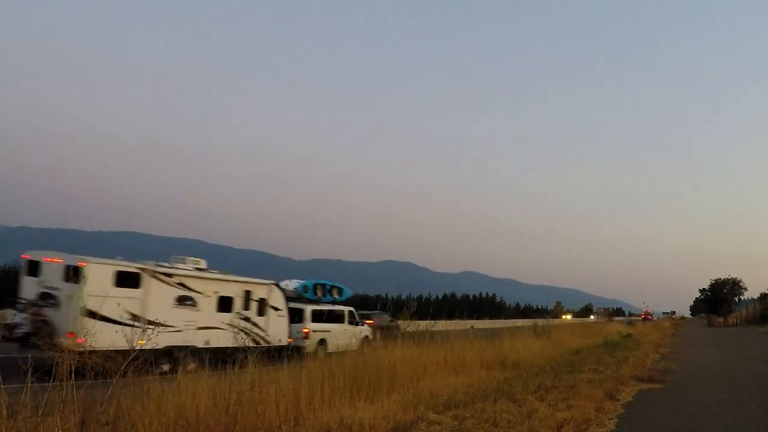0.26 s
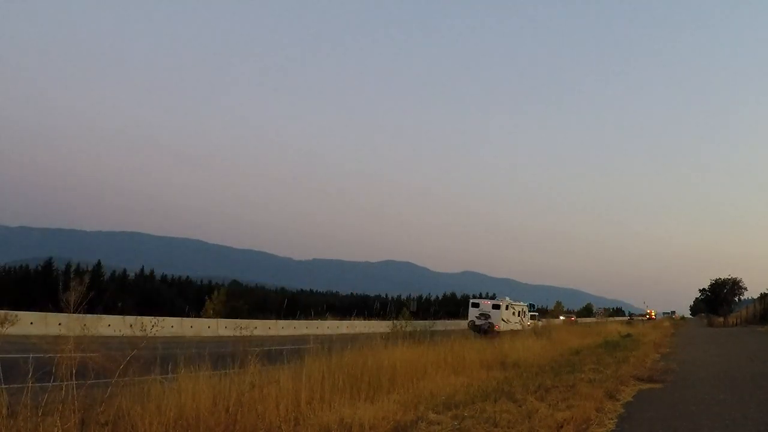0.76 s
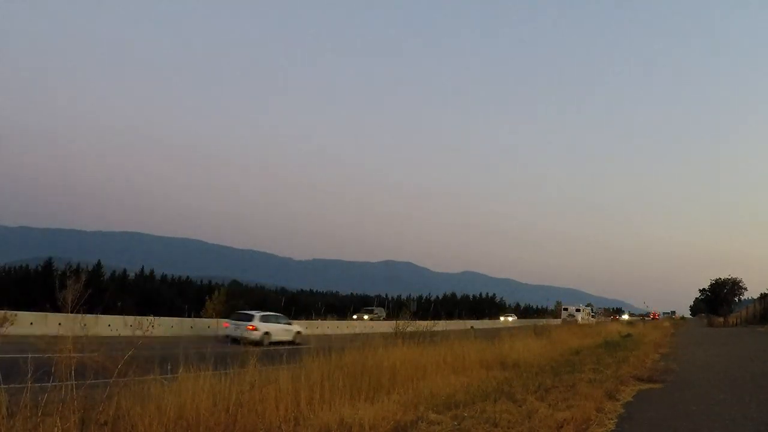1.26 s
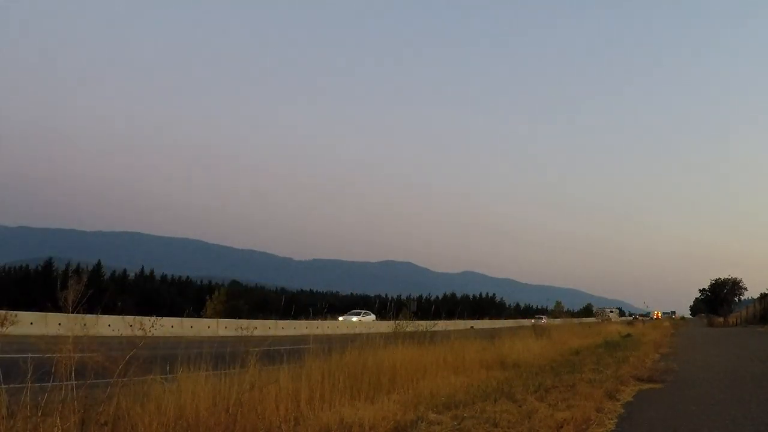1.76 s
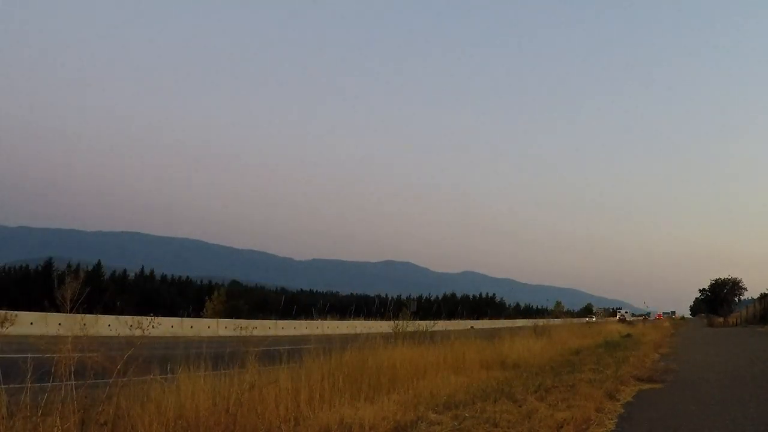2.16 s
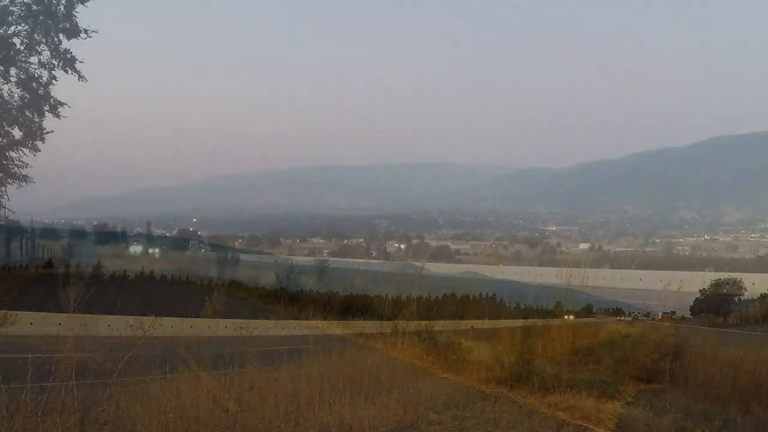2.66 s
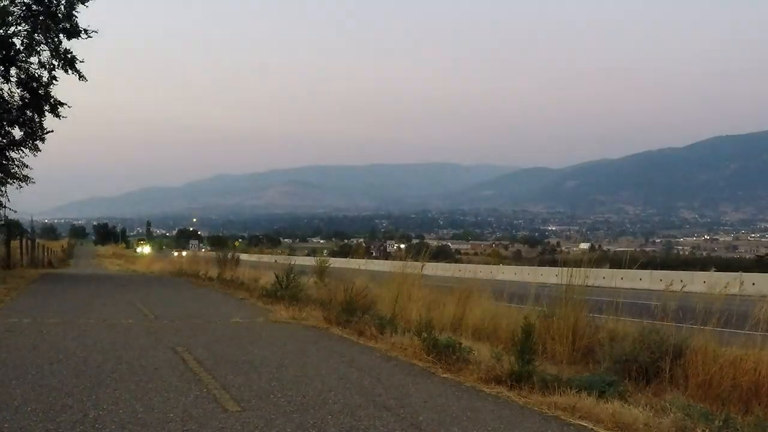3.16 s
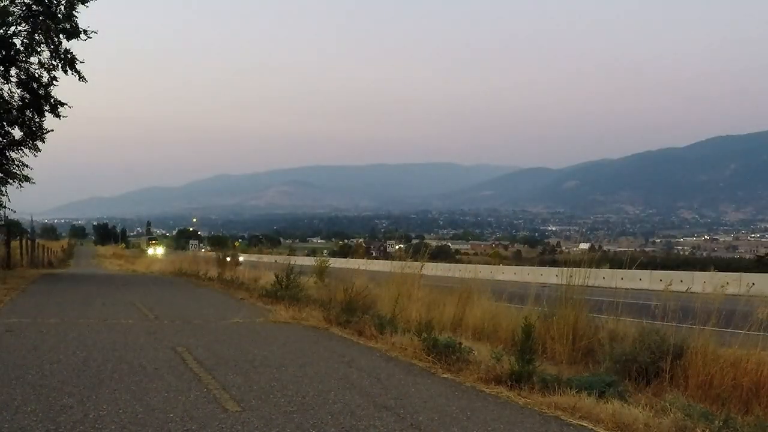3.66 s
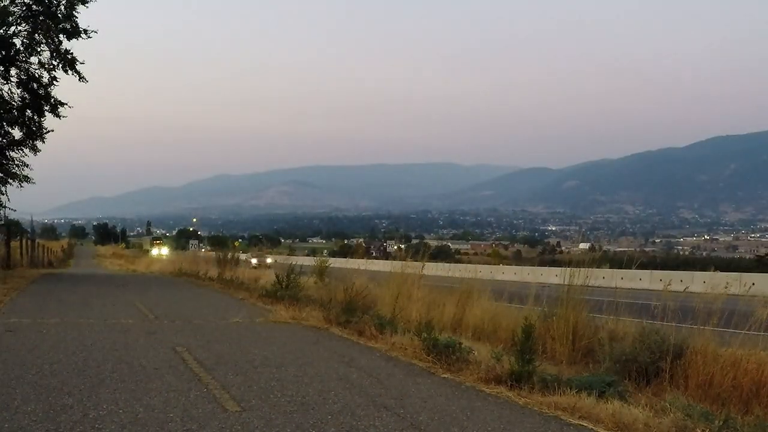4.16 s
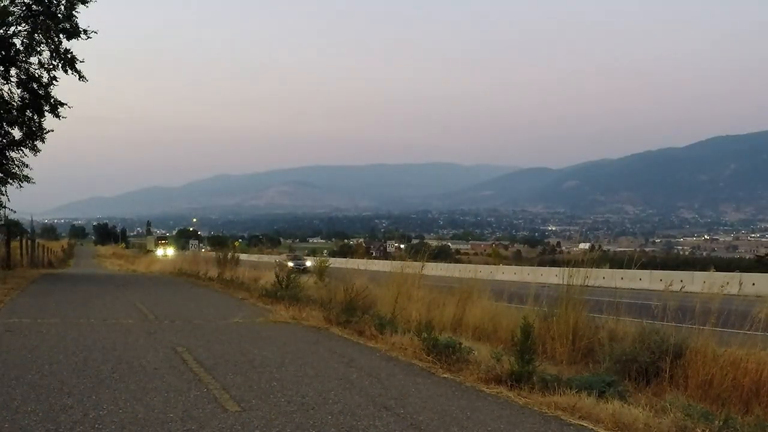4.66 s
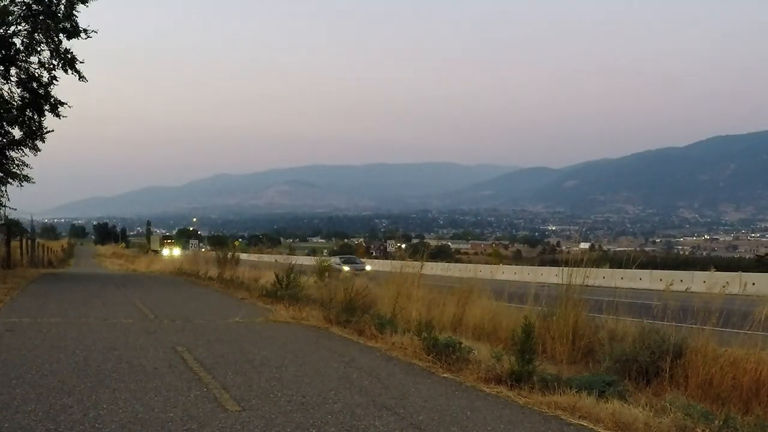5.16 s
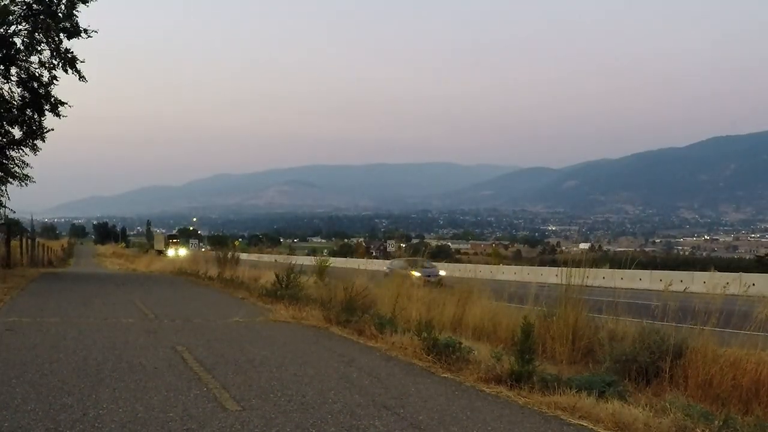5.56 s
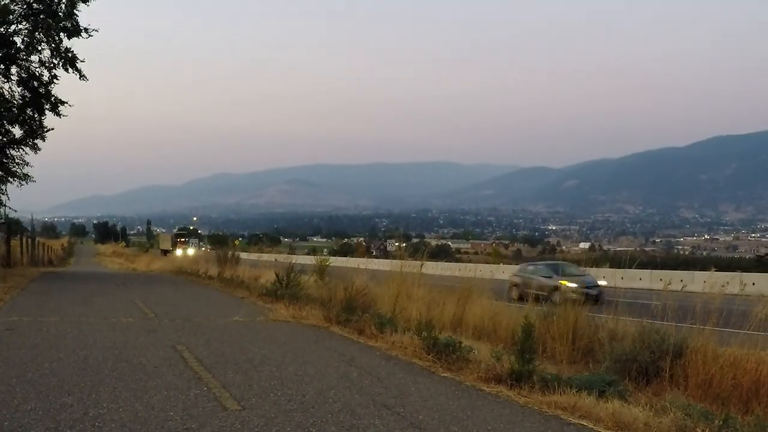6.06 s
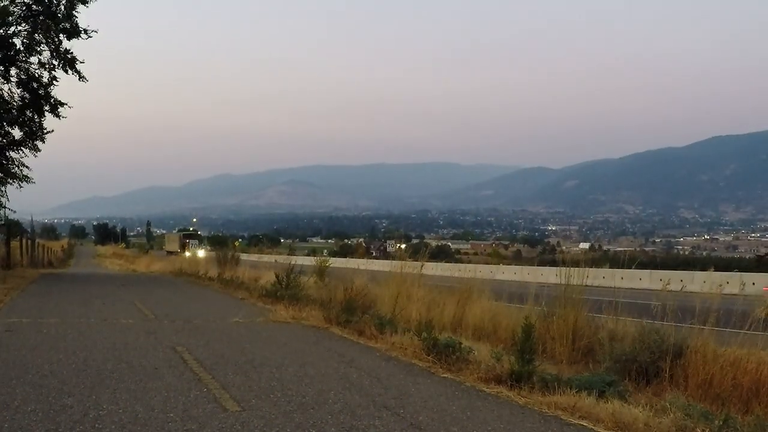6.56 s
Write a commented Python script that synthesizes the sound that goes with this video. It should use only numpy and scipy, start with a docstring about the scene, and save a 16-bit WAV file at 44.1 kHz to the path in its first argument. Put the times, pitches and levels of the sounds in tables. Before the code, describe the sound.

Close roadside microphone in open air. Dull, dense tyre roar and diesel hum build in overlapping surges, with bassy air buffeting and two small hard taps close by. A throaty exhaust boom and airy hiss mark the last wheels passing. The sound melts into quieter distant road rumble before a car swells steadily into a loud, bright tyre rush.

```python
"""Beside a highway: a heavy diesel truck goes by close to the microphone, then cars come on, louder and brighter.
Tyres are noise shaped over time by passing distance, with narrow sliding bands, exhaust booms, hollows and lifts;
engines, exhaust drones and a whine are wavering notes with an octave above, the diesel and drones sinking in pitch.
The truck's wake is lumpy low noise at the microphone; right next to it come a hard tick and a weaker one.
Faint clicks and an even hiss lie beneath."""
import sys
import numpy as np
from scipy import signal
from scipy.fft import rfft, irfft, next_fast_len
from scipy.io import wavfile
from scipy.ndimage import uniform_filter1d

SR = 44100
rng = np.random.default_rng(int(sys.argv[2]) if len(sys.argv) > 2 else 0)


def master_out(mix):
    """Clip the mix to full scale and print it as 16-bit PCM to the path in sys.argv[1]."""
    frames = np.transpose(np.atleast_2d(mix))
    ceiling = np.clip(frames, -1, 1)
    pcm = np.round(ceiling * 32767).astype(np.int16)
    wavfile.write(sys.argv[1], SR, pcm)


N = 301203

TIME = np.arange(N) / SR
FRAME, HOP = 2048, 512   # samples in a spectral frame and between frames
FRAME_S = np.arange(N // HOP + 2) * HOP / SR
BIN_HZ = np.maximum(np.arange(FRAME // 2 + 1) * SR / FRAME, 1)

# The truck's groups of wheels going by. Each row: nearest at in seconds, half-length in seconds,
# body rumble in dB, tyre roar in dB, tyre hiss in dB.
TRUCK_PASSES = [(2.1, 0.71, -25.5, -22.5, -63), (2.92, 0.39, -21, -19, -45.5),
                (3.58, 0.43, -22.5, -21, -40)]
# Distant traffic behind the truck: rumble in dB, roar in dB, hiss in dB.
TRUCK_FAR_DB = (-33, -26.5, -54)
# The oncoming cars. Each row: nearest at in seconds, half-length in seconds, rumble in dB, roar in dB, hiss in dB.
CAR_PASSES = [(5.3, 0.59, -38, -49.5, -47.5), (6.66, 0.56, -26.5, -21, -40)]
# Distant traffic behind the cars: rumble in dB, roar in dB, hiss in dB.
CARS_FAR_DB = (-30, -30.5, -52.5)
# Bright rushes of air as a vehicle draws level. Each row: strongest at in seconds, half-length in seconds,
# centre in Hz, glide in octaves, width in octaves, lift in dB.
AIR_RUSHES = [(3.02, .2, 5800, 0, .35, 2), (3.9, 0.22, 8200, 0, .35, 6), (3.68, .13, 11400, 0, .2, 8),
              (4, .15, 5000, 0.0067, 0.15, 5.5), (6.63, .3, 7200, 0, 0.36, 8)]


def from_db(db):
    """Decibels to gain."""
    return 10 ** (np.asarray(db) / 20)


def rms_one(x):
    """Scale to unit rms."""
    return x / np.sqrt(np.mean(x ** 2) + 1e-20)


def bell(x, centre, width):
    """A smooth hump of height 1."""
    return np.exp(-.5 * ((x - centre) / width) ** 2)


def at_hz(points, hz):
    """A spectrum in dB, read on a log-frequency axis."""
    known_hz, db = np.transpose(points)
    return np.interp(np.log(np.maximum(hz, 1)), np.log(known_hz), db)


def coloured_noise(points):
    """Steady noise with the given spectrum; rms 1."""
    size = next_fast_len(N)
    hz = np.arange(size // 2 + 1) * SR / size
    white = rfft(rng.standard_normal(size))
    return rms_one(irfft(white * from_db(at_hz(points, hz)), size)[:N])


def drift(rate):
    """Smooth chance with about `rate` turns a second; spread 1."""
    step = 40   # samples between the slow values
    pole = np.exp(-2 * np.pi * rate * step / SR)
    white = rng.standard_normal(N // step + 2002)
    slow = signal.lfilter([1], [1, -2 * pole, pole * pole], white)[2000:]   # drop the run-in
    return np.interp(np.arange(N) / step, np.arange(len(slow)), rms_one(slow))


def passing_levels(passes, far_db, times):
    """Rumble, roar and hiss in dB: each pass swells and fades with its distance, over the far traffic."""
    fall_off = 1.536   # power falls as the squared distance to this exponent
    power = from_db(far_db)[:, None] ** 2
    for s, half_s, *levels_db in passes:
        distance_squared = 1 + ((times - s) / half_s) ** 2   # nearest distance is 1
        power = power + from_db(levels_db)[:, None] ** 2 / distance_squared ** fall_off
    return 10 * np.log10(power)


def moving_bands(rows):
    """Peaks or dips that come, glide and go; dB over frequency and time."""
    out = 0
    for s, half_s, hz, glide, octaves, db in rows:
        centre = np.log2(hz) + glide * np.tanh((FRAME_S - s) / half_s)
        out = out + db * bell(FRAME_S, s, half_s) * bell(np.log2(BIN_HZ)[:, None], centre, octaves)
    return out


def rolling_noise(colour_db, levels_db):
    """Noise of a changing colour, tilted smoothly to steer rumble, roar and hiss to their levels."""
    # Where rumble, roar and hiss lie. Each row: low edge in Hz, high edge in Hz.
    road_bands = [(140, 450), (550, 1900), (2800, 6000)]
    power = from_db(colour_db) ** 2
    centres = np.log(np.prod(road_bands, axis=1)) / 2
    for (low, high), level_db, own in zip(road_bands, levels_db, np.eye(len(road_bands))):
        inside = (BIN_HZ >= low) & (BIN_HZ < high)
        band_db = 10 * np.log10(power[inside].sum(axis=0) / len(BIN_HZ))
        share = np.interp(np.log(BIN_HZ), centres, own)[:, None]
        colour_db = colour_db + share * (level_db - band_db)
    noise = rng.standard_normal((len(FRAME_S) - 1) * HOP)
    white = signal.stft(noise, nperseg=FRAME, noverlap=FRAME - HOP)[2]
    return signal.istft(white * from_db(colour_db), nperseg=FRAME, noverlap=FRAME - HOP)[1][:N]


def engine(hz, level_db, overtone_db, jitter, waver_db):
    """A firing note and its octave, wavering in pitch and level on the way through the air."""
    phase = 2 * np.pi * np.cumsum(hz * (1 + jitter * drift(10.0))) / SR
    note = np.sin(phase) + from_db(overtone_db) * np.sin(2 * phase)
    return np.sqrt(2) * note * from_db(level_db + waver_db * drift(6.1))


def sliding_bands():
    """Two narrow bands in the roar: one slides down, the other sinks and then rises again; dB over frequency and time."""
    # The two bands, a list each. Each row: time in seconds, centre in Hz, width in octaves, lift in dB.
    tracks = [
        [(0, 955, .14, 4.5), (1.05, 915, 0.14, 8.5), (1.4, 900, 0.15, 10.5), (1.9, 873, 0.12, 9),
         (2.2, 843, 0.18, 9), (2.7, 770, 0.098, 0)],
        [(2.05, 1300, .11, 2), (2.4, 1270, .11, 6), (2.65, 1170, 0.16, 8.5), (2.82, 1140, 0.23, 6.5),
         (2.95, 975, .14, 7.5), (3.1, 980, .12, 8.5), (3.3, 870, 0.12, 6.5), (3.55, 800, .12, 6.5),
         (3.8, 910, .11, 4), (4.03, 990, 0.064, 7), (4.4, 1080, 0.11, 0)],
    ]
    out = 0
    for track in tracks:
        s, *columns = np.transpose(track)
        hz, octaves, lift_db = (np.interp(FRAME_S, s, column) for column in columns)
        out = out + lift_db * bell(np.log2(BIN_HZ)[:, None], np.log2(hz), octaves)
    return out


def truck_tyres():
    """Broad roar with two sliding bands and the exhaust's boom, hollowed and lifted in places."""
    # Rolling noise before its bands are levelled. Each row: frequency in Hz, density in dB per Hz.
    roll = [(60, -1.5), (140, -2.5), (330, -7.5), (440, -5.5), (700, -5), (1050, -1.5), (1450, -3),
            (1850, -9.5), (2350, -20), (3200, -29.5), (4700, -42), (6200, -55), (9000, -66.5), (14000, -77)]
    # Booms of the exhaust. Each row: strongest at in seconds, half-length in seconds, centre in Hz,
    # glide in octaves, width in octaves, lift in dB.
    booms = [(2.75, 0.35, 313, 0.05, 0.12, 9), (3.3, 0.46, 244, -0.046, .085, 9),
             (3.3, 0.34, 194, -0.0088, 0.13, 3.5)]
    # Bands of the rolling noise that are hollowed or lifted, from low rumble to hiss. Each row: strongest at
    # in seconds, half-length in seconds, centre in Hz, glide in octaves, width in octaves, gain in dB.
    hollows_and_lifts = [(0.49, .5, 1960, -0.03, 0.31, -4.5), (.1, 0.71, 3300, -0.017, 0.12, 5),
                         (1.45, 0.72, 3890, 0.046, .1, -7), (2.1, 0.55, 4800, 0.049, .12, 1.5),
                         (3.13, 0.63, 2260, -0.21, 0.14, -7.5), (3.75, 0.22, 4400, 0, 0.14, -3),
                         (2.04, 0.89, 655, -0.15, 0.11, -2.5), (3.6, 0.54, 460, -0.062, 0.29, -5),
                         (3.5, 0.25, 626, -.05, 0.11, 5.5), (1.6, 0.5, 1810, 0.056, 0.19, 3),
                         (1.6, .45, 1100, -.04, 0.08, -0.5), (2.9, .22, 2650, -.04, .07, 4),
                         (3.38, .1, 1900, 0, 0.52, -3), (3.6, 0.11, 3400, 0, .1, 1),
                         (3.4, .4, 80, 0, .25, -6), (.3, .5, 1200, 0, .12, -2), (2.7, .3, 105, 0, 0.37, -3),
                         (.85, .2, 93, 0, .3, 4)]
    colour = at_hz(roll, BIN_HZ)[:, None] + sliding_bands() + moving_bands(booms)
    colour = colour + moving_bands(hollows_and_lifts) + moving_bands(AIR_RUSHES)
    levels_db = passing_levels(TRUCK_PASSES, TRUCK_FAR_DB, FRAME_S)
    flutter_db = 0.64
    return rolling_noise(colour, levels_db) * from_db(flutter_db * drift(31))


def doppler():
    """Pitch factor of the truck: above 1 as it nears, below 1 as it leaves."""
    share, nearest_s, glide_s = .055, 3.2, 0.535   # shift either way; middle and half-length of the sinking
    return 1 - share * np.tanh((TIME - nearest_s) / glide_s)


def truck_engine():
    """The diesel swells with the body rumble and sinks in pitch as it passes."""
    firing_hz, loudest_db = 112.1, -25.5   # when nearest, before surge and fade
    follows = 0.53   # share of the body rumble's swing in dB
    surge_s, surge_length_s, surge_lift_db = 3.6, 0.14, 7   # the exhaust pipe points at the microphone
    fade_s, fade_db_per_s = 4.2, 66   # the note dies away once the truck is past
    rumble_db = passing_levels(TRUCK_PASSES, TRUCK_FAR_DB, TIME)[0]
    surge_db = surge_lift_db * bell(TIME, surge_s, surge_length_s)
    fade_db = fade_db_per_s * np.maximum(TIME - fade_s, 0)
    level_db = loudest_db + follows * (rumble_db - rumble_db.max()) + surge_db - fade_db
    return engine(firing_hz * doppler(), level_db, overtone_db=-18.5, jitter=.006, waver_db=3.0)


def exhaust_drones():
    """Low tones of the exhaust pipe, heard as it draws level and sinking with the diesel."""
    # Each row: strongest at in seconds, half-length in seconds, frequency in Hz before the Doppler shift,
    # level in dB when strongest.
    drones = [(3.47, 0.34, 245, -27.5), (3.55, .16, 216, -25.5), (3.48, .18, 72.5, -24)]
    out = np.zeros(N)
    for s, half_s, hz, db in drones:
        tone = engine(hz * doppler(), db, overtone_db=-23, jitter=.009, waver_db=2.5)
        out += bell(TIME, s, half_s) * tone
    return out


def truck_whine():
    """A thin whine that goes with the truck, creeping up in pitch and swelling a little."""
    start_hz, rise_hz_per_s = 297, 2.1
    base_db, swell_db, nearest_s, length_s = -37.5, 2.5, 2.8, .5
    level_db = base_db + swell_db * bell(TIME, nearest_s, length_s)
    return engine(start_hz + rise_hz_per_s * TIME, level_db, overtone_db=-16, jitter=.0045, waver_db=1.3)


def wake():
    """Low, lumpy pressure on the microphone port, swelling with each eddy; the strongest pushes are rounded."""
    # Spectrum of the stirred air. Each row: frequency in Hz, density in dB per Hz.
    colour = [(12, -11.5), (22, 5), (33, 15), (48, 10), (66, 9.5), (95, 2.5), (140, -12), (250, -27),
              (600, -48), (5000, -110)]
    # Eddies and lulls at the microphone. Each row: middle in seconds, half-length in seconds, lift in dB.
    eddies = [(0.995, 0.021, 8), (1.3, .02, 4.5), (1.58, 0.022, 10.5), (1.826, .01, -9), (2.01, .05, -6),
              (2.125, .03, 9), (2.272, .028, 11), (2.5, .12, -2.5), (2.835, .018, 6), (3.132, 0.082, -6),
              (3.35, .04, 4), (3.557, 0.03, 8.5)]
    full_db, full_s, end_s = -16, 2.05, 3.57   # air stirred by the truck builds up, holds, then drops
    build_db_per_s, drop_db_per_s, breeze_db = 6.5, 46, -24.5
    air = coloured_noise(colour)
    air = air / np.sqrt(uniform_filter1d(air ** 2, size=3000) + 0.067)   # even out the slow swings
    building_db = build_db_per_s * np.maximum(full_s - TIME, 0)
    dropping_db = drop_db_per_s * np.maximum(TIME - end_s, 0)
    flow = np.hypot(from_db(full_db - (building_db + dropping_db)), from_db(breeze_db))
    eddies_db = sum(db * bell(TIME, s, half_s) for s, half_s, db in eddies)
    push, strongest = air * flow * from_db(eddies_db), .62
    return push / (1 + (push / strongest) ** 4) ** (1 / 4)


def tick(ring_hz, t60, rise_s, tail_db, tail_t60):
    """A light, hard tap: a few cycles of one damped mode, a faint after-ring and a low jolt of the microphone."""
    # Ticks right next to the microphone. Each row: start in seconds, relative strength in dB.
    ticks = [(1.82772, 4.75), (1.9375, -8)]
    jolt_hz, jolt_s, jolt_db = 54, .012, -13   # low sway just after the tap
    out = np.zeros(N)
    for s, db in ticks:
        age = np.clip(TIME - s, 0, 1)
        rise = 1 - np.exp(-(age / rise_s) ** 2)
        decay = from_db(-60 * age / t60) + from_db(tail_db - 60 * age / tail_t60)
        ring = rise * decay * np.sin(2 * np.pi * ring_hz * age)
        jolt = from_db(jolt_db) * bell(age, jolt_s, jolt_s) * np.sin(2 * np.pi * jolt_hz * age)
        out += from_db(db) * (jolt - 2 * ring)
    return out


def car_tyres():
    """Smooth roar, hollowed and lifted in bands that come and go."""
    # Rolling noise before its bands are levelled. Each row: frequency in Hz, density in dB per Hz.
    roll = [(20, 1), (80, 1), (260, 0), (360, -2.5), (440, -10.5), (580, -5), (720, -7.5), (1050, -6.5),
            (1350, -5), (1800, -10.5), (2300, -16.5), (3500, -23), (4300, -30), (5300, -34.5), (6600, -48),
            (14000, -73)]
    # Bands of the rolling noise that are hollowed or lifted, from low rumble to hiss. Each row: strongest at
    # in seconds, half-length in seconds, centre in Hz, glide in octaves, width in octaves, gain in dB.
    hollows_and_lifts = [(4.63, 0.93, 870, 0.11, 0.083, -8.5), (4.93, 0.48, 1440, 0.012, 0.089, 3.5),
                         (5.0, 0.39, 3700, .03, 0.098, 4.5), (5.83, 0.23, 2230, 0.06, 0.066, 6),
                         (6.43, 0.25, 2560, 0.034, 0.21, 6.5), (6.43, 0.39, 1640, 0.11, 0.082, -6.5),
                         (6.47, 0.26, 3580, .03, 0.087, 7), (6.56, 0.44, 1060, 0.13, 0.23, 4),
                         (6.4, 0.53, 560, .05, .13, -3), (4.86, .45, 2600, .08, 0.044, 4),
                         (4.75, .35, 2230, .04, .08, -2), (4.5, .45, 4700, 0, .1, 2.5),
                         (6.75, 0.18, 74, 0, .6, 4.5)]
    colour = at_hz(roll, BIN_HZ)[:, None] + moving_bands(hollows_and_lifts) + moving_bands(AIR_RUSHES)
    levels_db = passing_levels(CAR_PASSES, CARS_FAR_DB, FRAME_S)
    flutter_db = 0.34
    return rolling_noise(colour, levels_db) * from_db(flutter_db * drift(31))


def car_engine():
    """A low note that grows with the rumble of the oncoming cars."""
    firing_hz, below_rumble_db = 77.5, 7
    rumble_db = passing_levels(CAR_PASSES, CARS_FAR_DB, TIME)[0]
    return engine(firing_hz, rumble_db - below_rumble_db, overtone_db=-14, jitter=0.0078, waver_db=1.0)


def faint_clicks(low_hz, high_hz):
    """Tiny dry clicks: single-sample impulses thinned by a band filter."""
    # Each row: time in seconds, impulse strength in dB before the filter.
    impulses = [(.661, -38), (1.162, -38), (1.629, -35), (2.463, -29.5), (2.663, -29.5), (2.83, -28),
                (2.964, -33), (2.997, -27.5), (3.664, -31), (4.532, -32), (5.533, -37)]
    clicks = np.zeros(N)
    for s, db in impulses:
        clicks[round(s * SR)] = from_db(db)
    band = signal.butter(1, [low_hz, high_hz], "band", fs=SR, output="sos")
    return signal.sosfilt(band, clicks)


def even_hiss():
    """Steady coloured noise under it all."""
    # Each row: frequency in Hz, density in dB per Hz before levelling.
    colour = [(1000, 5), (6000, 0), (10000, -2.5), (15000, -7.5)]
    level_db = -61.5
    return from_db(level_db) * coloured_noise(colour)


def scene():
    """The truck gives way to the oncoming cars in an equal-power crossfade."""
    take_over_s, take_over_length_s = 4.137, 0.82   # middle and length
    turn = np.pi / 2 * np.clip((TIME - take_over_s) / take_over_length_s + .5, 0, 1)
    truck = truck_tyres() + truck_whine() + exhaust_drones() + wake()
    cars = car_tyres() + car_engine()
    tap = tick(ring_hz=1540, t60=.0058, rise_s=.00052, tail_db=-30, tail_t60=.02)
    clicks = faint_clicks(low_hz=3500, high_hz=10000)
    # the diesel has its own fade, so it stays outside the crossfade
    return (truck_engine() + np.cos(turn) * truck + np.sin(turn) * cars + tap + clicks + even_hiss())[None]


def record(dry):
    """The highest peaks overload; the ends are eased; the top is cut."""
    ease_s, cutoff_hz = .003, 15300
    ease = np.minimum(np.minimum(TIME, TIME[::-1]) / ease_s, 1)
    clipped = np.clip(dry, -1, 1) * ease
    return signal.sosfilt(signal.ellip(10, .1, 90, cutoff_hz, fs=SR, output="sos"), clipped)


dry = scene()
out = record(dry)
master_out(out)
```